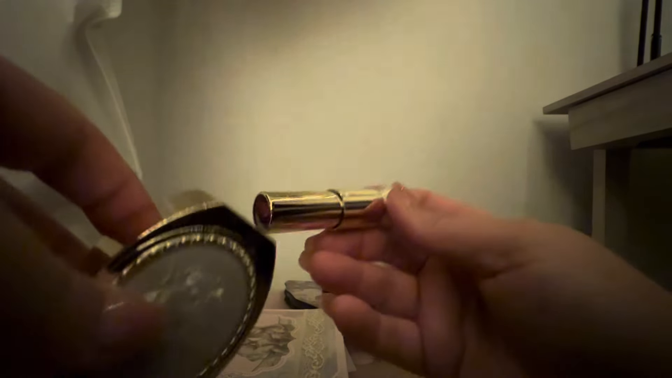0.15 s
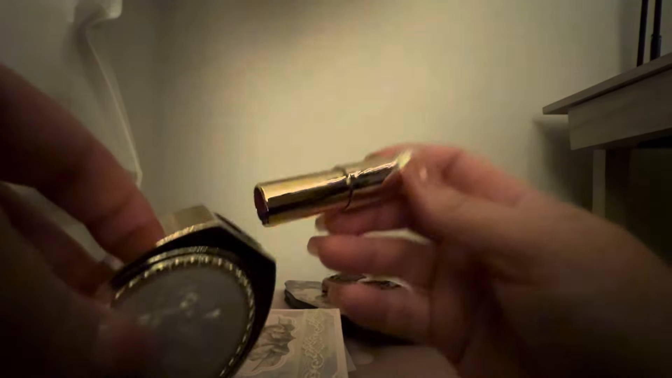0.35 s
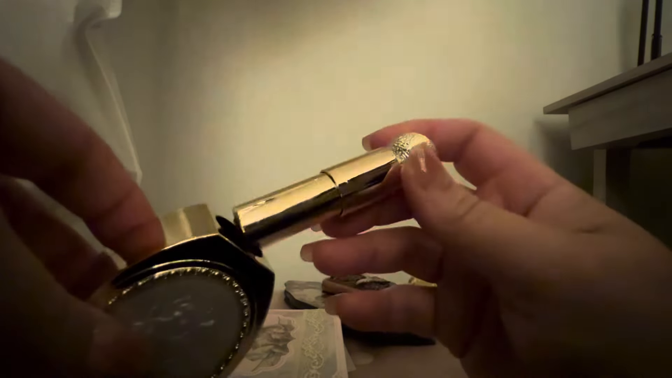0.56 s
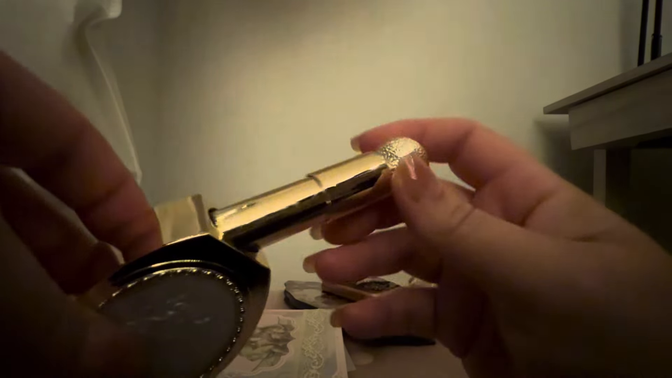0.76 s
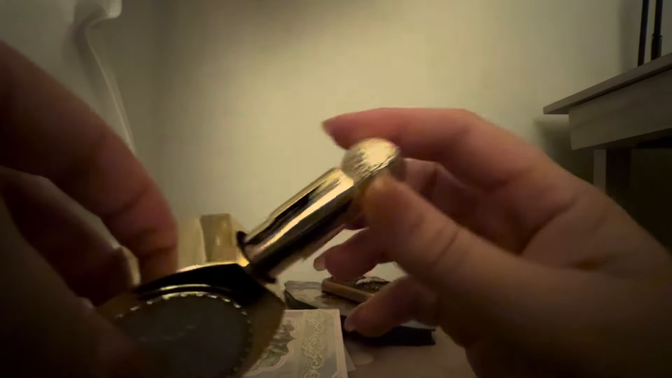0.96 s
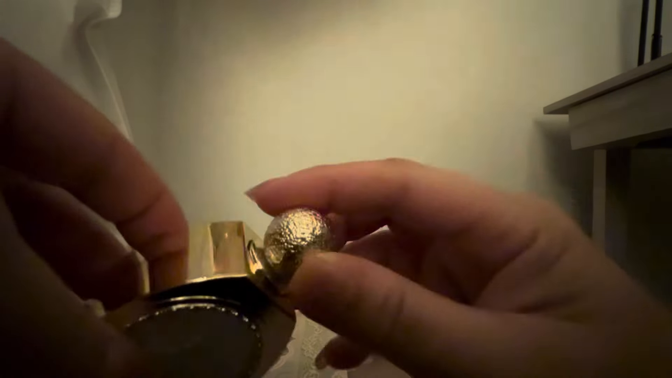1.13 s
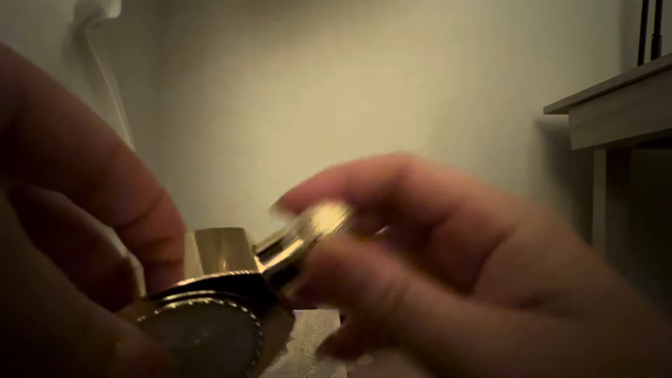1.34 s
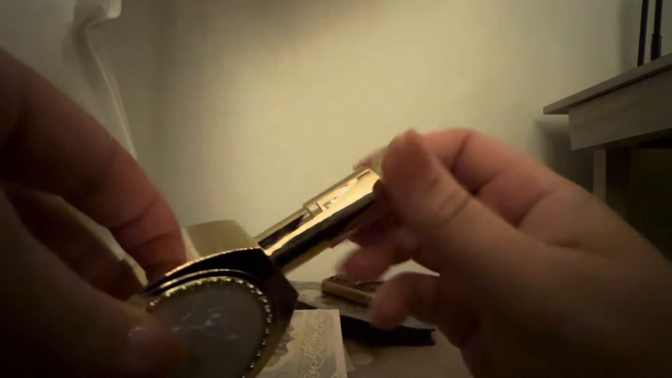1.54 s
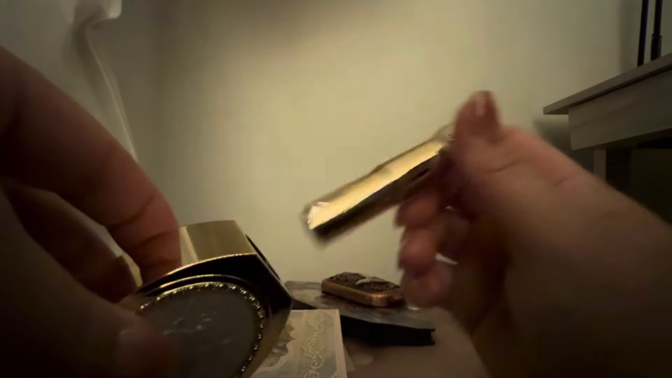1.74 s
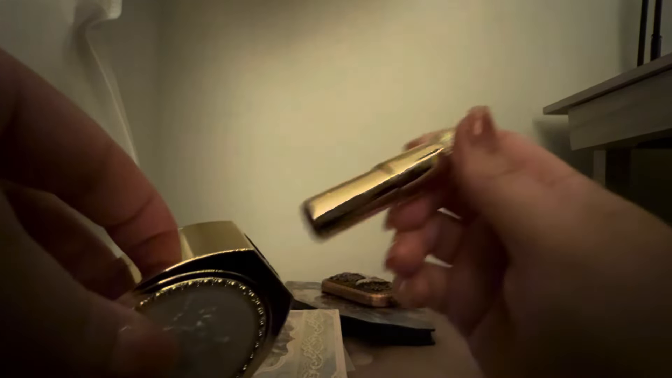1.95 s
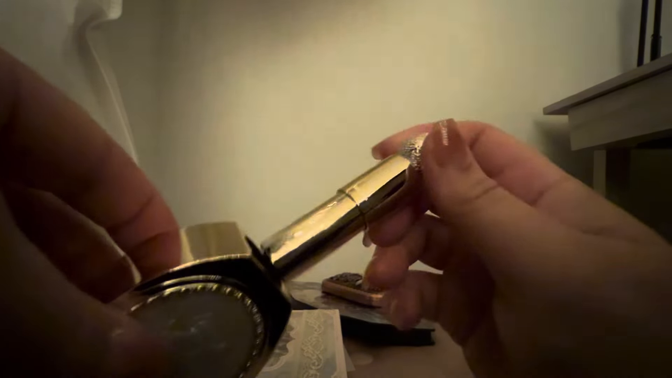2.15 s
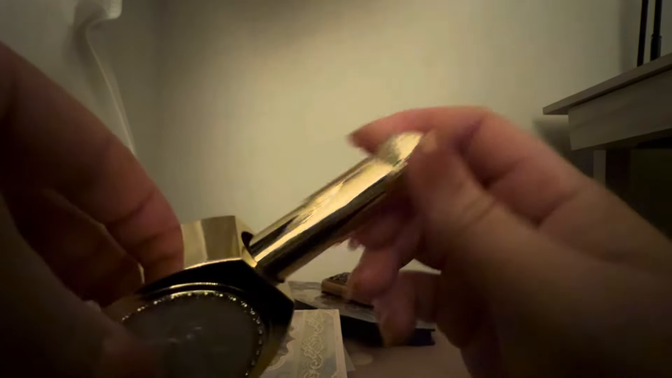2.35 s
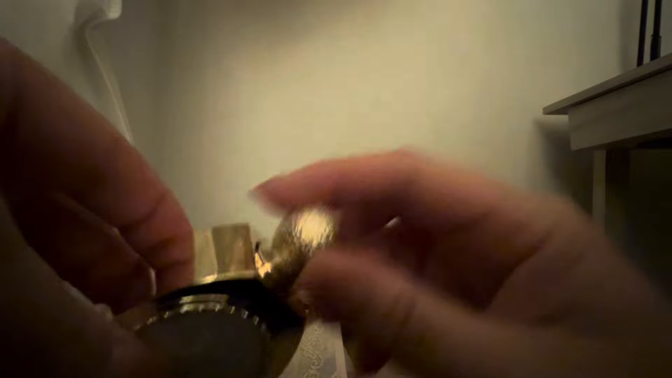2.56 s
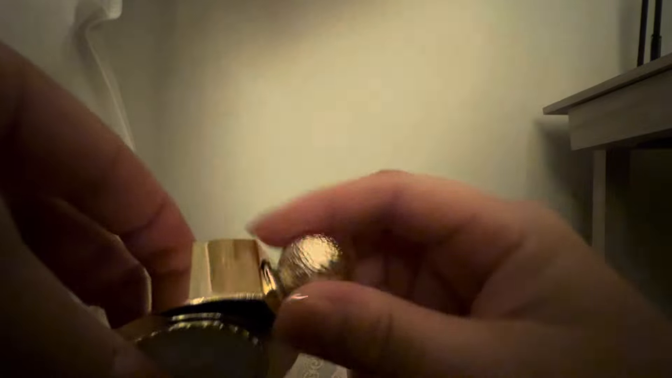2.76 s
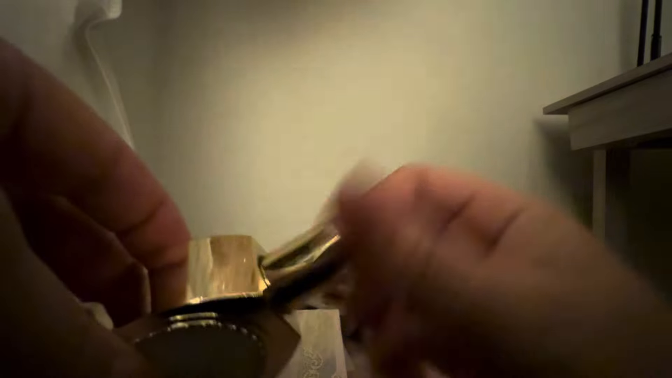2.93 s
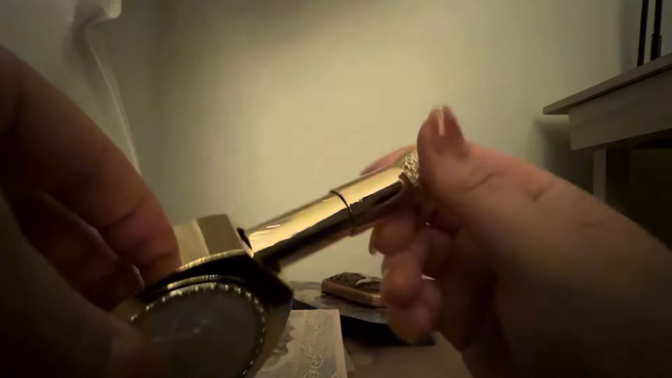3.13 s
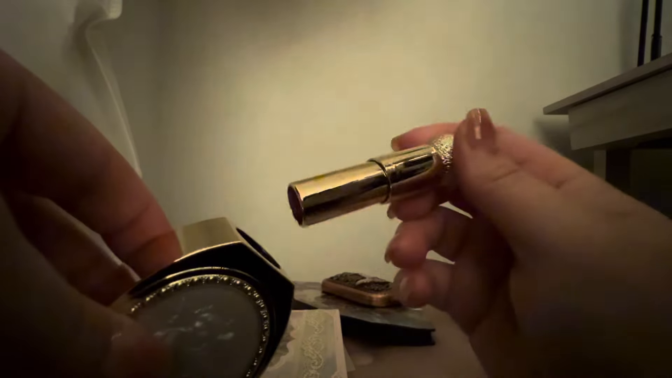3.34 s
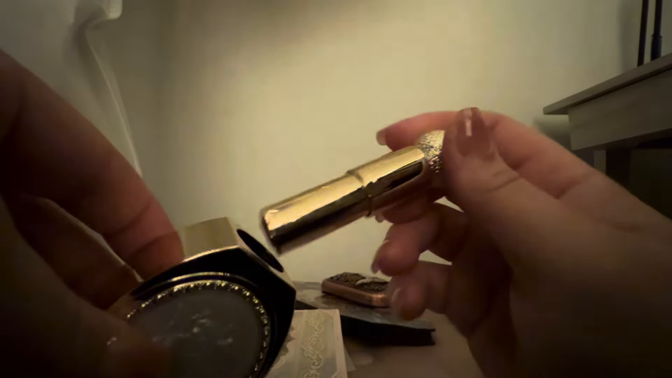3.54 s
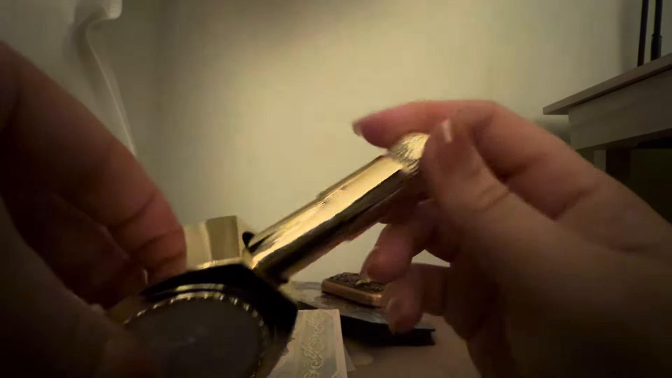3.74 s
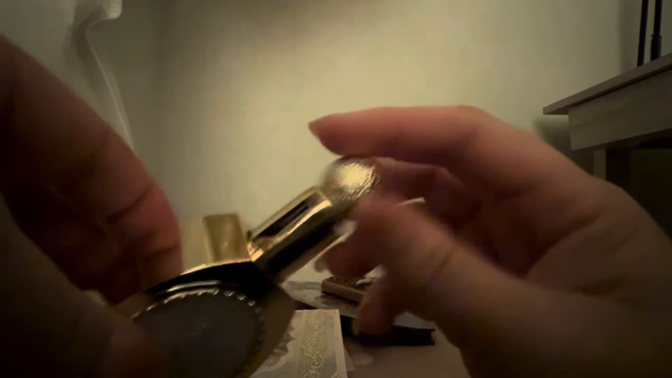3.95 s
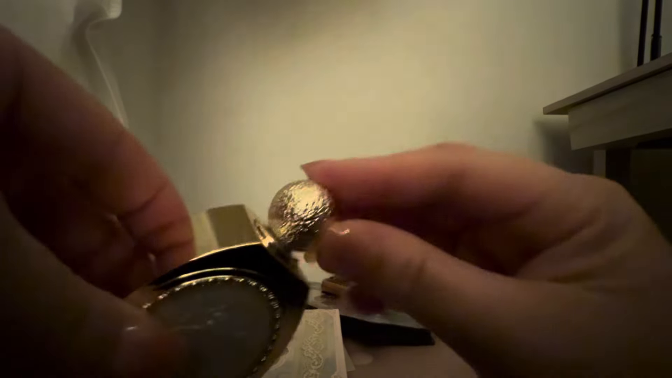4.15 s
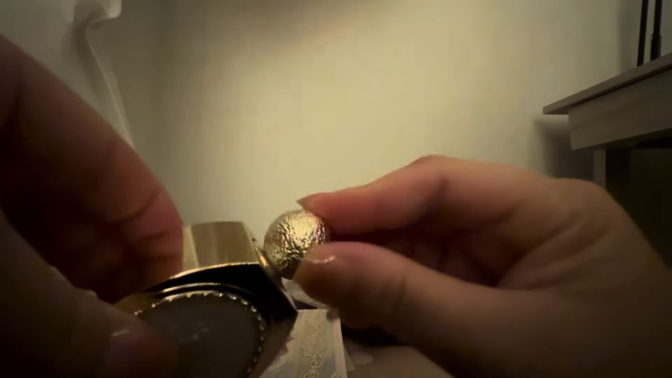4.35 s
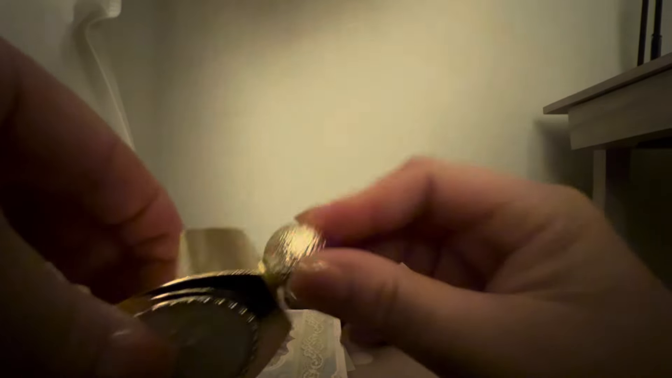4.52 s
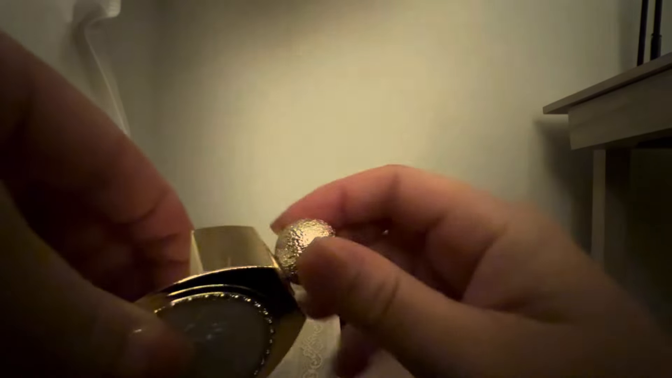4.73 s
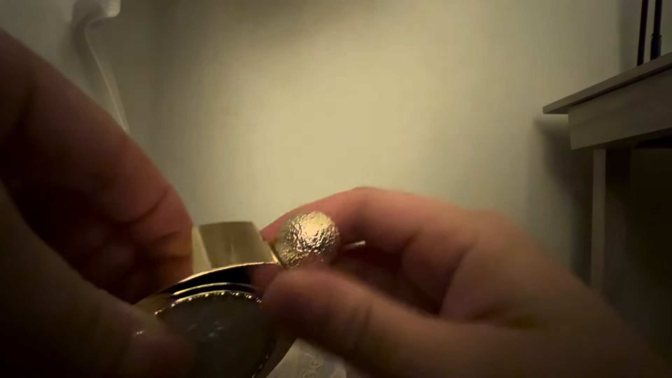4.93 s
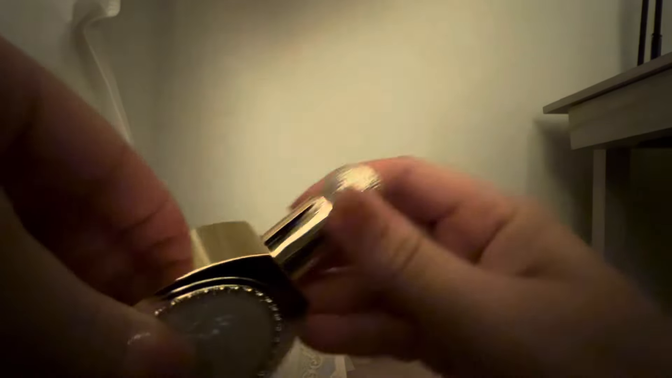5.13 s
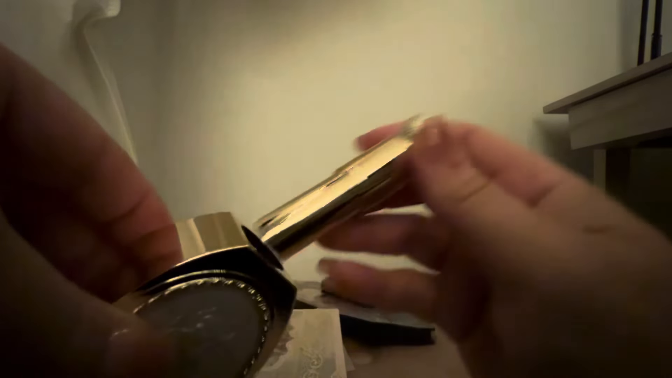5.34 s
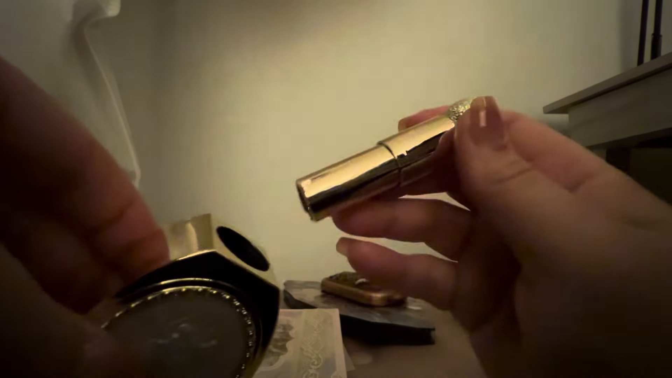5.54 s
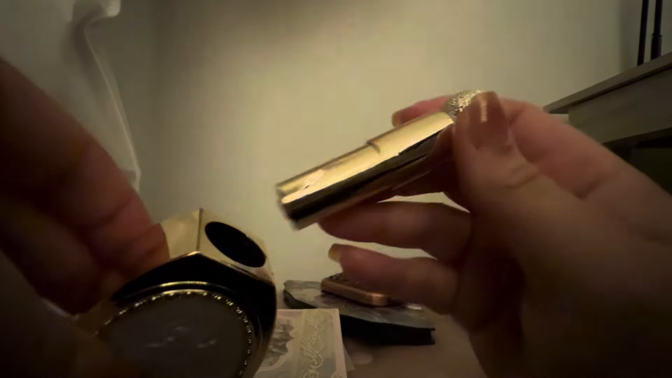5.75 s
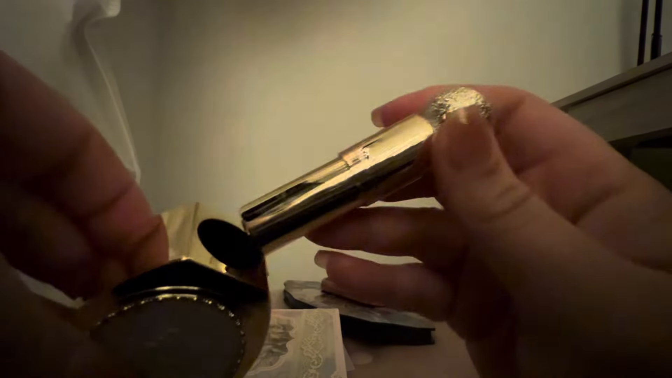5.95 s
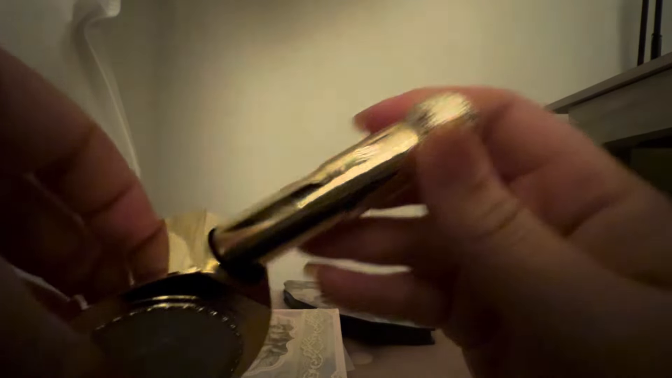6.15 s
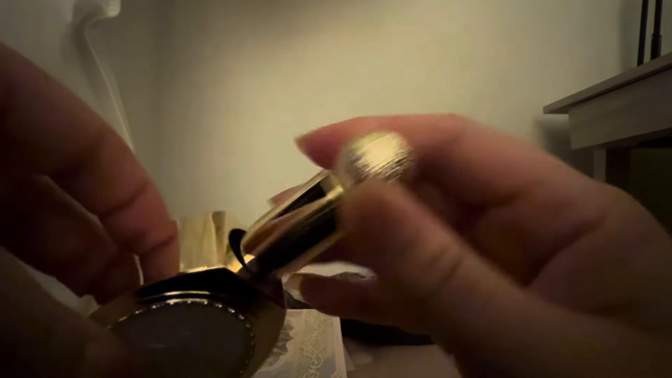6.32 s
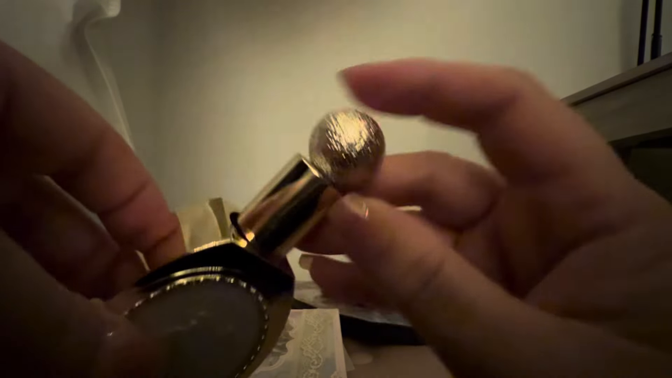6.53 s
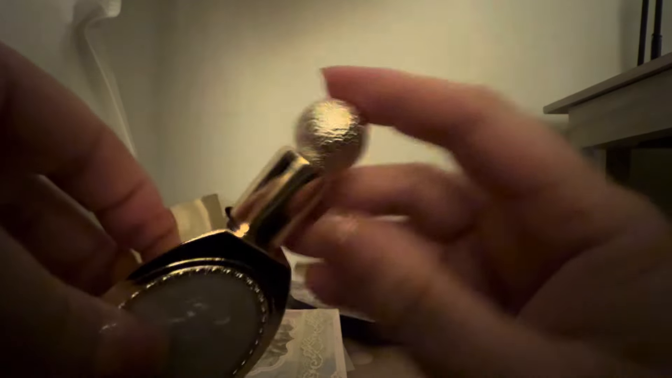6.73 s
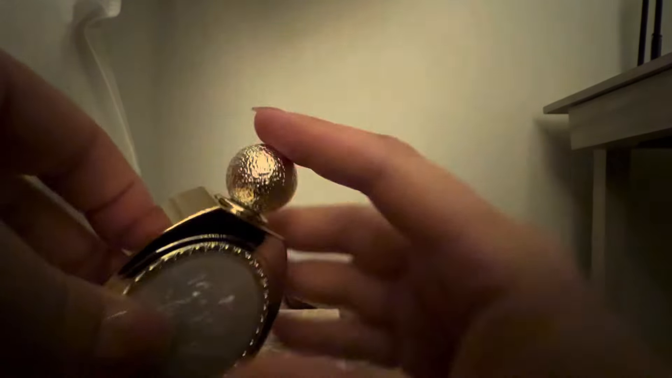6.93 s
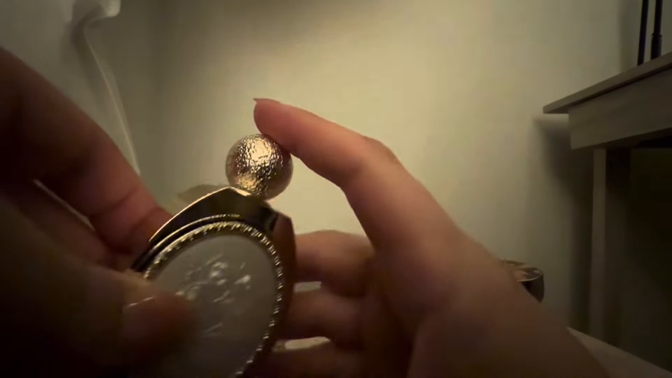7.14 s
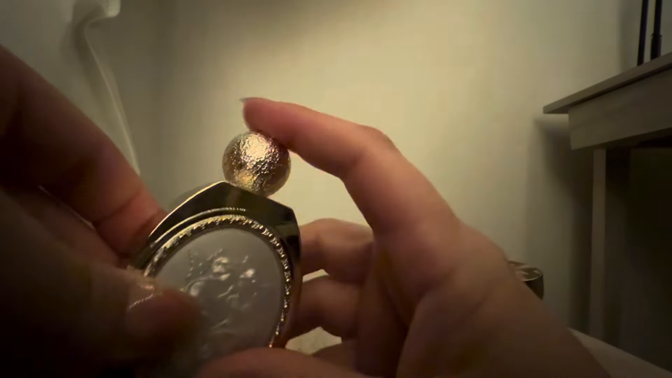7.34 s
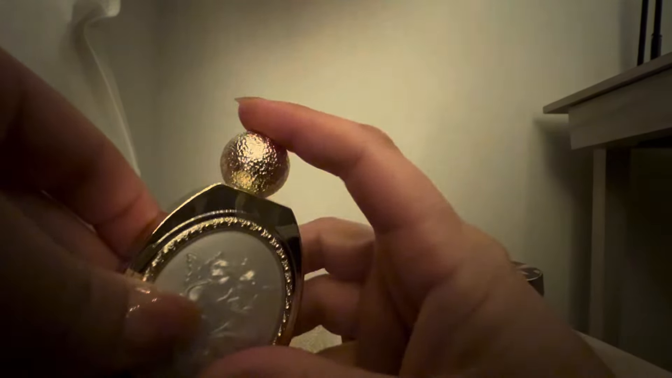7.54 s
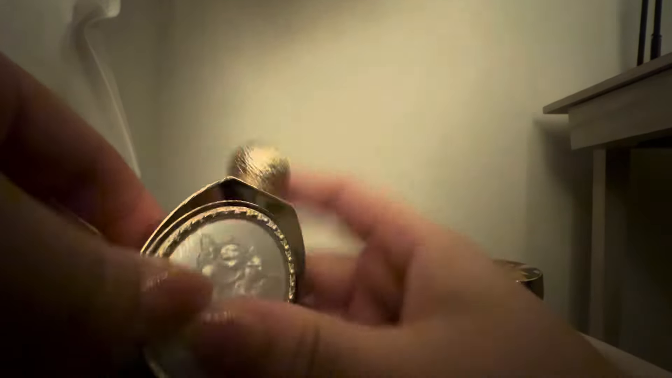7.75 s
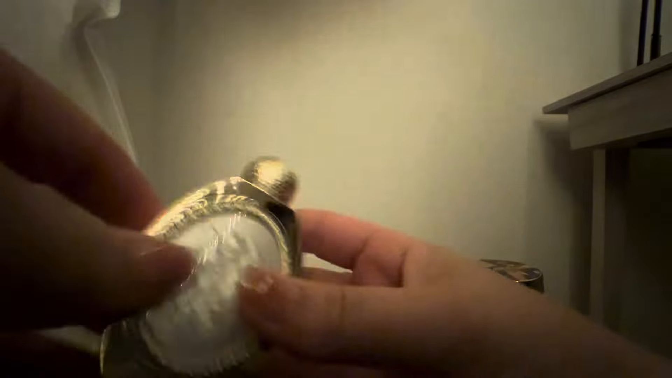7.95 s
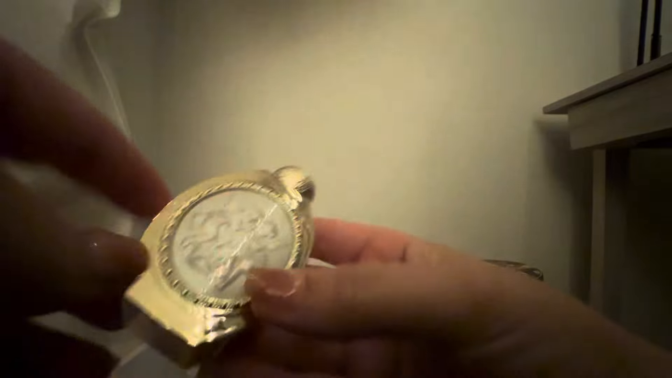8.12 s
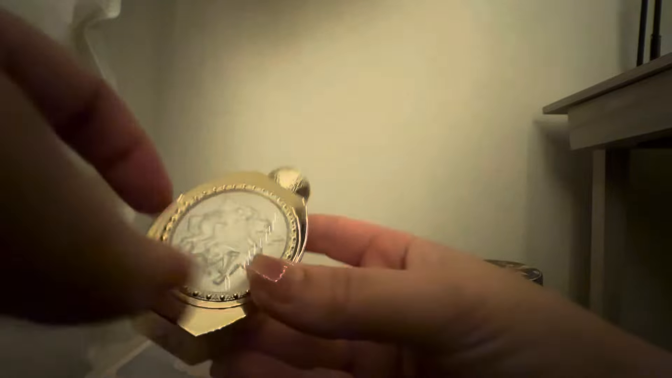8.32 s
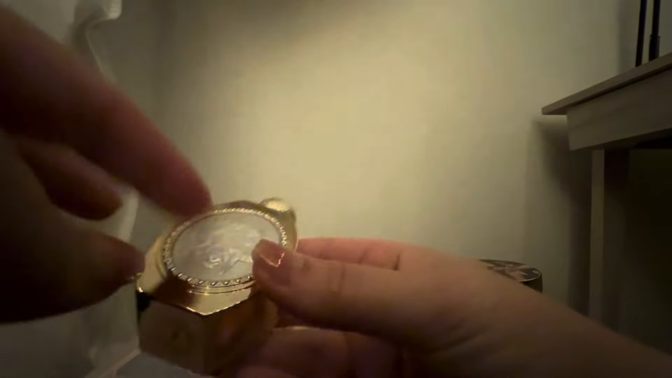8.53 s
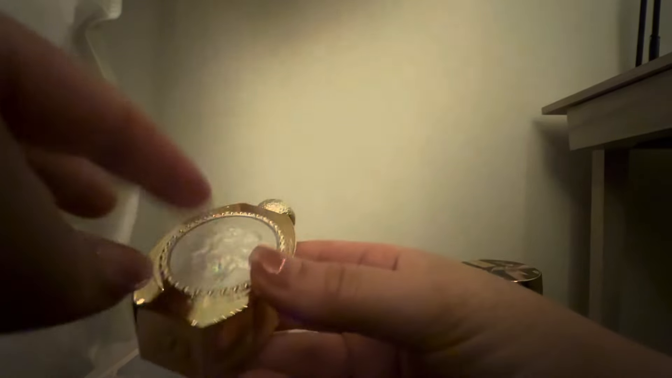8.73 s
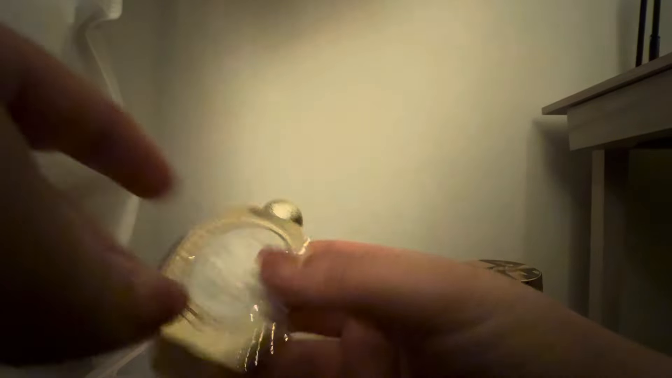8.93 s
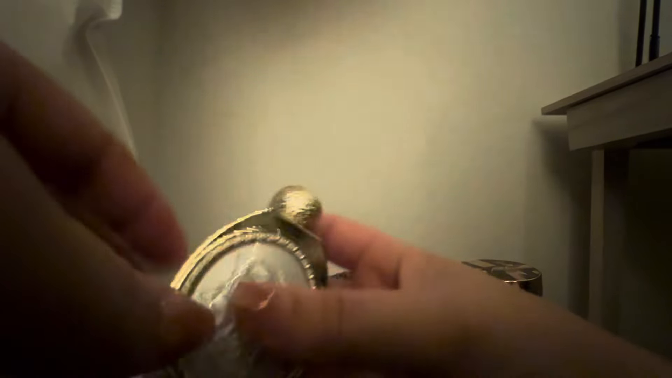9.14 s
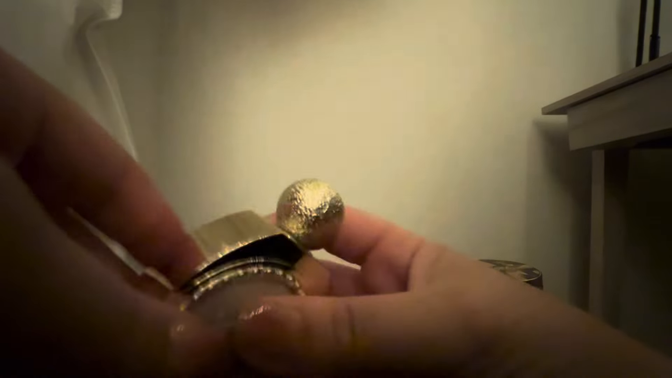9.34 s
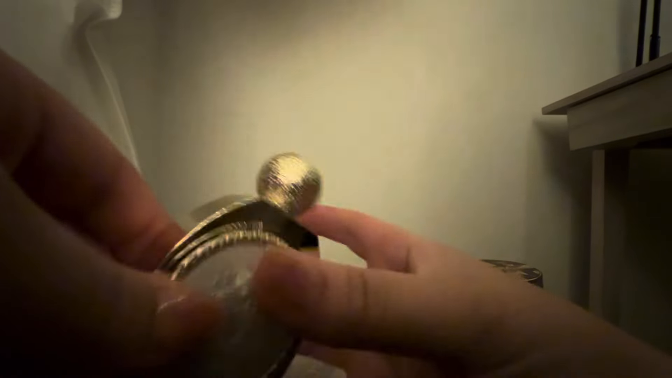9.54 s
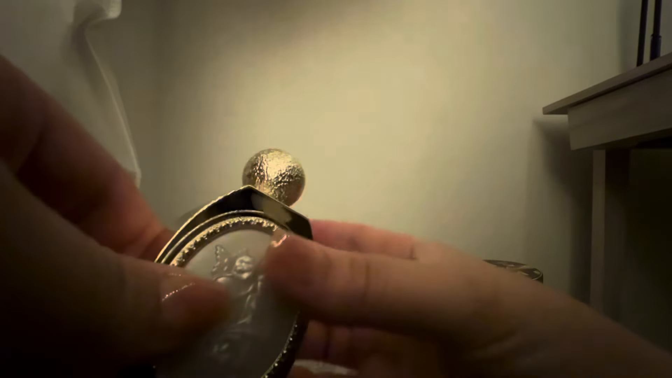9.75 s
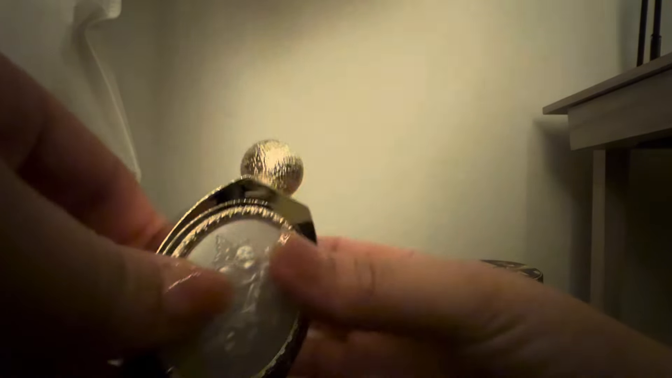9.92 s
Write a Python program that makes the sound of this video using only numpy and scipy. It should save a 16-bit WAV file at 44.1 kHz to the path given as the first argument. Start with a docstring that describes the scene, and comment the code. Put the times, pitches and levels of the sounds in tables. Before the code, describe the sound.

Very close to the microphone in a small quiet room, fingers tick on a metal case while a metal tube is repeatedly pushed into its socket and pulled out with tight clusters of clacks, short scrapes and two small hollow pops. The tube snaps home dryly, then fingernails snap and skid brightly across the rim and lid. Faint low hum and soft hiss continue.

```python
"""Over a low room hum and soft hiss, fingers first tick and rub on a metal powder compact, close by.
A metal lipstick tube knocks and scrapes in the compact's socket; the air column pops as it leaves, twice.
In between and later the tube snaps home; last, nails snap off the rim and skid over the lid.
Contacts are clicks and noise bursts through ringing case modes; rubs and rustle are grainy noise.
A short room and a shaded, lagging right port place it in stereo."""
import sys
import numpy as np
from scipy import signal
from scipy.fft import rfft, irfft, next_fast_len
from scipy.io import wavfile
from scipy.ndimage import uniform_filter1d

SR = 44100
rng = np.random.default_rng(int(sys.argv[2]) if len(sys.argv) > 2 else 0)


def unload_audio(sound):
    """Save the sound as a 16-bit wav file, at the path given as the first command line argument."""
    columns = np.transpose(np.atleast_2d(sound))
    # keep every value between -1 and 1, then stretch to whole-number steps
    steps = np.round(np.clip(columns, -1, 1) * 32767)
    wavfile.write(sys.argv[1], SR, steps.astype(np.int16))


N = 440118
BLOW_S = np.arange(SR // 5) / SR  # time within one blow
GRAZE_SAMPLES, ATTACK_SAMPLES = 88, 353


def undb(db):
    """Decibels to gain."""
    return 10 ** (np.asarray(db) / 20)


def fade(t_s, t60_s):
    """Exponential decay, 60 dB down after t60_s."""
    return np.exp(-np.log(1000) * t_s / t60_s)


def convolve(x, response):
    """Pass x through a response, keeping its length."""
    return signal.fftconvolve(x, response)[:len(x)]


def add(track, start_s, sound):
    """Mix a sound in at start_s."""
    start = max(int(start_s * SR), 0)
    track[start:start + len(sound)] += sound[:N - start]


def over_frequency(table, size):
    """Columns of a (Hz, ..) table, interpolated over log frequency on the bins of a spectrum."""
    hz, *columns = np.transpose(table)
    log_bins = np.log(np.fft.rfftfreq(size, 1 / SR) + 1)
    return [np.interp(log_bins, np.log(hz), column) for column in columns]


def colour(x, points):
    """Minimum-phase filter with the given (Hz, dB) outline, by folding the cepstrum."""
    size = 1024
    cepstrum = irfft(np.log(undb(over_frequency(points, size)[0])))
    cepstrum[1:size // 2] *= 2
    cepstrum[size // 2 + 1:] = 0
    return convolve(x, irfft(np.exp(rfft(cepstrum))))


# FLOOR: spectral density of hum and hiss.
# Each row: frequency in Hz, left in dB per Hz, right in dB per Hz.
FLOOR = [(25, -93, -99), (47.9, -75.5, -80), (65, -71.5, -74.5), (97.7, -76, -85), (141, -94, -99),
         (302, -101, -106), (695, -107, -108), (1160, -109, -118), (1290, -97, -112), (1863, -91, -110),
         (2420, -111, -122), (3930, -118, -127), (7794, -118, -131), (10280, -130, -136),
         (14000, -144, -144)]


def background(shared_below_hz=150):
    """Steady shaped noise: a low wavering hum largely common to both sides, under a soft band of hiss."""
    left_db, right_db = over_frequency(FLOOR, N)
    left, own = rfft(rng.standard_normal((2, N))) * np.sqrt(SR / 2)
    likeness = .96 / (1 + (np.fft.rfftfreq(N, 1 / SR) / shared_below_hz) ** 4)
    right = likeness * left + np.sqrt(1 - likeness ** 2) * own
    return irfft(np.array([left * undb(left_db), right * undb(right_db)]), N)


def room(x, near_db=-12, near_t60_s=0.18, far_db=-23, far_t60_s=0.26, gap_s=0.0019, table_s=.013, table_db=-20):
    """Close surfaces answer at once, the walls ring on briefly; the top treble is soaked up."""
    t_s = np.arange(SR // 2) / SR
    response = np.zeros(len(t_s))
    for db, t60_s in (near_db, near_t60_s), (far_db, far_t60_s):
        tail = rng.standard_normal(len(t_s)) * fade(t_s, t60_s) * np.minimum(t_s / gap_s, 1) ** 2
        response += undb(db) * tail / np.linalg.norm(tail)
    response[int(table_s * SR)] += undb(table_db)
    absorption = [(120, -0.5), (600, -2.0), (1500, -3.5), (3000, -5.0), (6000, -1.5), (9000, 1.5), (13000, -17.5)]
    return colour(convolve(x, response), absorption)


# PORT: right port against the left.
# Each row: frequency in Hz, level in dB, phase lag in rad, scattered share 0-1.
PORT = [(70, -9.5, 1.6, 0.5), (182.2, -10.5, 0.28, 0.2), (526, -6.5, 2.9, 0.5), (1050, -3.5, 4.57, 0.3),
        (2490, -8, 5.06, 0.7), (5270, -17.5, 5.8, 0.98), (9800, -6.5, 3.3, 0.97), (10120, -2, 3.3, 0.1),
        (12270, 2, 6.5, 0), (15400, -5.5, 18, 0.94)]


def ports(x, scatter_t60_s=0.049, count=9):
    """Left is direct; right is shaded, lags, and gets sound scattered by the hands, differently in each pose."""
    size = next_fast_len(N + SR)
    db, lag_rad, share = over_frequency(PORT, size)
    share = np.clip(share, 0, 1)
    pose = np.linspace(0, count - 1, N)
    scattered = np.zeros(N)
    scatters = rng.standard_normal((count, len(BLOW_S))) * fade(BLOW_S, scatter_t60_s)
    for k, scatter in enumerate(scatters):
        span = np.flatnonzero(abs(pose - k) < 1)
        posed = x[span] * np.cos(np.pi / 2 * (pose[span] - k))  # crossfade between poses
        add(scattered, span[0] / SR, signal.fftconvolve(posed, scatter / np.linalg.norm(scatter)))
    direct = np.sqrt(1 - share) * np.exp(-1j * lag_rad) * rfft(x, size)
    right = direct + np.sqrt(share) * rfft(scattered, size)
    return np.array([x, irfft(right * undb(db), size)[:N]])


def body(modes, ring_db, spot_db=3, detune=.012):
    """A click and its ringing; the spot that is struck and the grip reweight and detune the modes."""
    hz, db, t60_s = np.transpose(modes)[:, :, None]
    spot, grip = rng.standard_normal((2, len(modes), 1))
    size = undb(db + ring_db + spot_db * spot) * 2 * np.log(1000) / (t60_s * SR)
    ringing = np.cos(2 * np.pi * hz * (1 + detune * grip) * BLOW_S)
    response = np.sum(size * fade(BLOW_S, t60_s) * ringing, axis=0)
    response[0] += 1
    return response


# EDGES_HZ: edges in Hz of the thump, hollow, shell, metal and glint ranges.
EDGES_HZ = [90, 350, 1050, 3200, 9500, 16500]
RANGES = [signal.butter(3, edges, "band", fs=SR, output="sos") for edges in zip(EDGES_HZ, EDGES_HZ[1:])]


def voice(sound, levels_db, size):
    """Filter a contact towards the given RMS per range over its first samples; short lists name upper ranges."""
    count = len(levels_db)
    gains_db = [db - 20 * np.log10(np.std(signal.sosfilt(sos, sound[:size])))
                for db, sos in zip(levels_db, RANGES[-count:])]
    edges = EDGES_HZ[-count - 1:]
    inset = 2 ** (1 / 3)
    outline = [(hz, db) for lo, hi, db in zip(edges, edges[1:], gains_db) for hz in (lo * inset, hi / inset)]
    return colour(sound, outline)


def strike(modes, outline, levels_db, ring_db, graze_db, chatter_db, chatter_t60_s, rattle_db, rattle_t60_s):
    """Surfaces graze, meet sharply, chatter briefly and rattle on; all of it drives the modes."""
    graze, chatter, rattle = rng.standard_normal((3, len(BLOW_S)))
    push = undb(chatter_db) * chatter * fade(BLOW_S, chatter_t60_s)
    push += undb(rattle_db) * rattle * fade(BLOW_S, rattle_t60_s)
    push[0] += 1
    rise = np.linspace(0, 1, GRAZE_SAMPLES) ** 2
    push = np.concatenate([undb(graze_db) * graze[:GRAZE_SAMPLES] * rise, push])
    rung = convolve(push, body(modes, ring_db))
    return voice(colour(rung, outline), levels_db, GRAZE_SAMPLES + ATTACK_SAMPLES)


def touch(db, hardness_db):
    """Hollow, shell and metal levels of a light contact: a hard one loses its bass, a soft one its treble."""
    return db - max(hardness_db, 0), db - abs(hardness_db) / 2, db + min(hardness_db, 0)


def rustle(rustle_db=-79, stir_db=2, stir_hz=5, grain_db=4.0, busy_db=4.5, busy_s=0.25):
    """The hands never hold quite still: grainy skin noise wavers, louder where knocks and ticks crowd."""
    marks_s = np.arange(0, N / SR + 1, 1 / stir_hz)
    grains = rng.standard_normal(N) * undb(grain_db * np.minimum(rng.exponential(size=N), 6))
    skin = colour(grains, [(100, 6.5), (260, 4), (600, -9.5), (1500, -18), (5500, -13.5), (8500, -11), (13000, -38)])
    stir = np.interp(np.arange(N) / SR, marks_s, rng.standard_normal(len(marks_s)))
    contacts = np.zeros(N)
    contacts[[int(s * SR) for s, *_ in KNOCKS + TICKS]] = 1
    size = int(busy_s * SR)
    density = uniform_filter1d(uniform_filter1d(contacts, size), size)
    busy = np.clip(density * size, 0, 2)
    return skin / np.std(skin) * undb(rustle_db + stir_db * stir + busy_db * busy)


# CASE: modes of the hand-held case.
# Each row: nominal frequency in Hz, relative level in dB, nominal t60 in seconds.
CASE = [(410, -10.5, 0.0046), (713.5, 5, 0.034), (863, 2, 0.025), (1353, 6, 0.03), (1720, -3, 0.012),
        (2200, 2, 0.07), (3120, -3, 0.013), (4183, 6, 0.055), (5545, 11.5, 0.02), (6060, 5.5, 0.025),
        (6460, 12.5, 0.028), (7000, 7, 0.035), (8870, 12, 0.023), (11660, 7.5, 0.01)]
# SLIDING: colour of sliding. Each row: frequency in Hz, level in dB.
SLIDING = [(100, -2), (280, 9), (900, 0), (2000, 0), (3200, -0.5), (4500, 1), (5900, 5), (8000, -5.5),
           (10000, -14), (12500, -15), (16000, -12.5)]
# RUBS: skin and tube sliding over the case.
# Each row: start, firmest and end in seconds, level before range offsets and pressure in dB, hardness in dB.
# Firmest past the end: the stroke stops while rising; before the start: it only falls.
RUBS = [(0, -0.3, .2, -71, 1), (.7, 1.2, .92, -64.5, -6), (1.3, 1.6, 1.48, -63.5, 0),
        (2.225, 2, 2.43, -65, 0.5), (2.47, 3, 2.62, -54.5, -5.5), (2.669, 2.92, 2.98, -70, -4.5),
        (3.956, 4.5, 4.01, -48.5, -3), (4.546, 3.5, 4.9, -68, 5), (5.045, 4.5, 5.18, -52.5, -3.5),
        (5.214, 6, 5.34, -63, 13), (6.101, 6, 6.3, -65.5, -7), (7.038, 6.5, 7.31, -62.5, -6),
        (7.658, 8, 7.722, -48, 14), (7.775, 8, 7.85, -54, 15), (7.85, 7.89, 7.95, -55.5, 5),
        (7.88, 8, 8.015, -51.5, 14), (8.638, 8.5, 8.675, -49, 24), (8.8, 9.5, 8.875, -51.5, 21),
        (8.896, 9, 9.02, -59, 23), (9.09, 9.5, 9.24, -64, 16.5), (9.271, 9.5, 9.36, -53.5, 11),
        (9.366, 9.5, 9.45, -65.5, 17)]


def rubs(grain_db=4.0, slip_db=3.0, slip_hz=160, swell=0.76, hollow_db=-1, shell_db=-6, metal_db=2,
         glint_db=-5, bite=0.36, firm_db=-55, skid_db=-24, skid_hardness_db=34, skid_glint_db=-16,
         skid_peak_s=0.02, skid_s=0.064):
    """Dense tiny catches of uneven size excite the case under changing pressure.
    Firmer strokes glint more; after each nail snap the nail skids on over the lid, hard but smooth."""
    out = np.zeros(N)
    catches = rng.standard_normal(N) * undb(grain_db * np.minimum(rng.exponential(size=N), 5))
    slips = uniform_filter1d(rng.standard_normal(N), int(SR / slip_hz)) * np.sqrt(SR / slip_hz)
    friction = colour(catches * undb(slip_db * slips), SLIDING)
    strokes = [(*times, db, hardness_db, glint_db + bite * (db - firm_db)) for *times, db, hardness_db in RUBS]
    skids = [(s, s + skid_peak_s, s + skid_s, db + skid_db, skid_hardness_db, skid_glint_db)
             for s, _, db, _ in NAILS]
    for start_s, firmest_s, end_s, db, hardness_db, edge_db in strokes + skids:
        span = np.arange(int(start_s * SR), int(end_s * SR))
        hollow, shell, metal = touch(db, hardness_db)
        levels_db = hollow + hollow_db, shell + shell_db, metal + metal_db, metal + edge_db
        stroke = voice(convolve(friction[span], body(CASE, ring_db=-7.5)), levels_db, len(span))
        pressure = np.interp(span / SR, [start_s, firmest_s, end_s], [0, 2, 0])
        add(out, start_s, stroke * pressure ** swell)
    return out


# TOUCH: colour of a light touch. Each row: frequency in Hz, level in dB.
TOUCH = [(120, -22.5), (300, -3.5), (700, -5.5), (1200, -1.5), (2500, 2), (5000, -1), (8500, -8),
         (11500, -22.5), (16000, -27)]
# TICKS: light touches, from a soft fingertip (hardness below 0) to bare metal (above 0).
# Each row: time in seconds, level before range offsets and trim in dB, hardness in dB.
TICKS = [(.0933, -48, 1), (0.2392, -51.5, -12.5), (0.2824, -60.5, 29), (0.418, -67, -2), (0.535, -56, -17),
         (0.5962, -48, 11.5), (0.6448, -55, 0), (0.6896, -50.5, 11), (.7325, -55, -9.5),
         (0.7589, -49, 13.5), (0.79, -54, -3.5), (.823, -60, 13), (.881, -58.5, 6.5), (0.9595, -56, 9.5),
         (1.214, -61.5, 9.5), (1.271, -63, -8.5), (1.351, -59, -13), (1.376, -53.5, -22), (1.713, -56, 0),
         (1.98, -59.5, 3.5), (2.2256, -54.5, 7), (2.292, -52.5, 10.5), (2.3362, -52.5, 8),
         (2.549, -46, -7.5), (2.699, -55.5, 1.5), (2.7834, -55.5, -14), (3.4178, -53.5, -11),
         (3.642, -60, 5), (3.6854, -47.5, 11), (3.756, -49, 10.5), (4.157, -55.5, 0), (4.251, -51.5, -16.5),
         (4.3372, -50, 2.5), (4.3616, -49, 0.5), (4.406, -47, -12.5), (4.5918, -53, 2), (4.654, -46, 2),
         (4.753, -48.5, 8), (4.7798, -52, 0), (4.815, -44.5, -10.5), (5.0013, -55.5, 2.5),
         (5.065, -51.5, 1), (5.128, -47, -4), (5.2682, -46.5, 19.5), (5.363, -61.5, 6.5),
         (5.483, -51.5, -12.5), (5.677, -51.5, 2), (5.785, -56, -13), (6.1992, -50, 3.5), (6.221, -52, 10),
         (6.2694, -52, 4.5), (6.3055, -50, 6), (6.645, -59.5, -13.5), (6.8693, -53, -12),
         (7.0812, -48.5, -13.5), (7.286, -50.5, -11), (7.429, -56.5, -5.5), (7.5049, -51, -12.5),
         (7.725, -54.5, 2.5), (7.7761, -54.5, 3), (7.8307, -45, -15.5), (7.9573, -51.5, 9),
         (7.969, -44.5, 3.5), (8.0384, -48.5, -13.5), (8.045, -56, 49), (8.0798, -57.5, 38),
         (8.2187, -52, 0.5), (8.516, -61, 4), (9.1842, -55.5, -14), (9.587, -60, -1.5), (9.813, -61, 0.5)]


def ticks(shell_db=-2, glint_db=-21, sparkle=.5, stray_db=-63, stray_spread_db=8, stray_hardness_db=12,
          stray_s=0.18, count=10, trim_db=3.0):
    """Light touches, damped by the fingers; fainter stray ones follow as the grip settles."""
    out = np.zeros(N)
    strays = []
    for which, late, faint, hard in rng.random((count, 4)):
        s = TICKS[int(which * len(TICKS))][0] + stray_s * late
        strays.append((s, stray_db - stray_spread_db * faint, stray_hardness_db * (2 * hard - 1)))
    for s, db, hardness_db in list(TICKS) + strays:
        hollow, shell, metal = touch(db, hardness_db)
        levels_db = hollow, shell + shell_db, metal, metal + glint_db + sparkle * hardness_db
        tick = strike(CASE, TOUCH, levels_db, ring_db=-9.0, graze_db=-12.0, chatter_db=-4,
                      chatter_t60_s=0.017, rattle_db=-17.5, rattle_t60_s=0.088)
        add(out, min(s, N / SR) - GRAZE_SAMPLES / SR, tick)
    return out * undb(trim_db)


# NAIL: colour of a nail snap. Each row: multiple of its pitch, level in dB.
NAIL = [(.03, -12.5), (0.149, -36), (.37, -17.5), (0.562, -7), (0.772, -0.5), (1, 3), (1.2, -4),
        (1.598, -17), (2.5, -26.5)]
# NAILS: a nail slips off the rim of the compact.
# Each row: time in seconds, pitch in Hz, metal level before trim in dB, glint over metal in dB.
NAILS = [(8.3183, 6550, -35.5, -20), (8.5657, 5620, -31, -13.5), (8.603, 5440, -42.5, -17),
         (8.774, 5070, -29.5, -16), (8.8907, 6900, -44.5, 2), (9.0397, 7440, -25.5, -1)]


def nails(shell_db=-13, held=.35, trim_db=2.5):
    """Hard, bright snaps on the rim; the holding hand shortens and broadens the modes, and the lid jingles on."""
    out = np.zeros(N)
    modes = [(hz, db, t60_s * held) for hz, db, t60_s in CASE]
    for s, pitch_hz, db, edge_db in NAILS:
        outline = [(multiple * pitch_hz, outline_db) for multiple, outline_db in NAIL]
        levels_db = db + shell_db, db, db + edge_db
        snap = strike(modes, outline, levels_db, ring_db=-0.5, graze_db=-8, chatter_db=-4,
                      chatter_t60_s=0.006, rattle_db=-31.5, rattle_t60_s=0.15)
        add(out, s - GRAZE_SAMPLES / SR, snap)
    return out * undb(trim_db)


# CONTACT: colour of a knock or pop. Each row: frequency in Hz, level in dB.
CONTACT = [(100, 5.5), (300, 4), (700, 3), (1400, -1.5), (2400, -10), (3300, -1), (4400, 6.5), (6500, 1.5),
           (8000, -1), (10000, -13), (12000, -10), (16000, -17.5)]
# SOCKET: air column of the open socket.
# Each row: nominal frequency in Hz, relative level in dB, t60 in seconds.
SOCKET = [(1301, 34, 0.049)]
# POPS: the tube clears the socket. Each row: time in seconds, shell level before trim in dB.
POPS = [(2.0959, -36), (5.9056, -41)]


def pops(hollow_db=-2, metal_db=-12, glint_db=-16, trim_db=0.65):
    """The opened socket sounds its air column along with the metal."""
    out = np.zeros(N)
    for s, db in POPS:
        levels_db = db + hollow_db, db, db + metal_db, db + glint_db
        pop = strike(CASE + SOCKET, CONTACT, levels_db, ring_db=-11.5, graze_db=-36, chatter_db=-17.0,
                     chatter_t60_s=0.0089, rattle_db=-23.5, rattle_t60_s=0.023)
        add(out, s - GRAZE_SAMPLES / SR, pop)
    return out * undb(trim_db)


# CATCH: colour of the catch snapping home. Each row: multiple of its pitch, level in dB.
CATCH = [(.08, -7.5), (.3, -6.5), (.6, 2), (1, 5.5), (1.5, -5), (2.2, -4.5), (3.2, -10), (5, -11.5),
         (7, -22.5), (12, -21.5)]
# SNAPS: the tube is pressed home.
# Each row: time in seconds, catch pitch in Hz, shell level before trim in dB,
# then hollow (weight), metal (treble) and glint (edge) over shell in dB.
SNAPS = [(4.314, 2630, -28, -9.5, -2, -20.5), (6.7844, 1340, -26, -22, -8, -7.5),
         (7.3602, 1163, -22, -10.5, -10, -18.5)]


def snaps(thump_db=-7, gripped_db=-18, trim_db=0.5):
    """The catch takes the tube with one short, dry click; the firm grip lets the case ring only faintly."""
    out = np.zeros(N)
    for s, pitch_hz, db, weight_db, treble_db, edge_db in SNAPS:
        outline = [(multiple * pitch_hz, outline_db) for multiple, outline_db in CATCH]
        levels_db = db + np.array([weight_db + thump_db, weight_db, 0, treble_db, edge_db])
        snap = strike(CASE, outline, levels_db, gripped_db, graze_db=-13.0, chatter_db=-14.5,
                      chatter_t60_s=0.011, rattle_db=-39.5, rattle_t60_s=0.09)
        add(out, s - GRAZE_SAMPLES / SR, snap)
    return out * undb(trim_db)


# KNOCKS: tube against socket; a square hit has weight (bass), a hit on the rim has edge (glint).
# Each row: time in seconds, metal level before trim in dB, hollow (weight) over metal in dB,
# glint (edge) over metal in dB, nominal tube ring in Hz, set by its depth and the grip.
KNOCKS = [(0.9898, -36.5, -4, -5, 5390), (1.002, -42.5, -2, -9, 5780), (1.021, -29, 5, 6.5, 8300),
          (1.036, -38, -8, -16.5, 6350), (1.04, -39.5, -5, 1, 5420), (1.086, -24.5, -7, -13.5, 5400),
          (1.089, -25, -11, -23.5, 5430), (1.4107, -39, -2.5, -11, 5310), (1.432, -42, -7, -2, 4040),
          (1.4437, -41.5, -5.5, -4, 4590), (2.2522, -37.5, -18.5, -6, 5490),
          (2.4106, -35.5, -10, -13, 4660), (2.4194, -40.5, -15, -19, 4520), (2.428, -27, -5.5, -9, 5410),
          (2.4534, -22.5, -4.5, -9, 6300), (2.4577, -35.5, 10.5, -7, 6200), (2.9427, -42.5, -5, -10, 6500),
          (2.9626, -32.5, -5, -4, 5100), (3.8915, -41.5, -4.5, -8.5, 4670), (3.913, -32.5, -3, -4, 5300),
          (3.9396, -29.5, 8.5, 8, 4900), (3.9727, -38, -1, -5, 5770), (4.005, -35.5, -9.5, -30, 5390),
          (4.0258, -25.5, -10, -13.5, 6230), (4.032, -30, -4, -21, 5110), (5.0753, -39.5, 2.5, -2, 6440),
          (5.098, -45.5, 3, -2.5, 6300), (5.2354, -42, -7, -9, 5330), (5.2543, -40, -2, -7, 4710),
          (6.2947, -37, -4, -15, 6180), (6.319, -35.5, 4.5, -13.5, 3940), (6.3656, -25.5, -7, -11, 6840),
          (6.372, -37, 6, -6, 6440), (6.7404, -45.5, 2.5, -13.5, 7010), (6.752, -43, 5, -6, 5400),
          (6.759, -35.5, -7.5, -19, 5180), (6.786, -29.5, 1.5, -8, 4850), (6.795, -40.5, 3, -3, 6600)]


def knocks(ring_db=-6.5, tube_db=17, tube_t60_s=.01, freedom=0.17, thump_db=-7, shell_db=-2, flex=0.18,
           firm_db=-26, trim_db=-1.0):
    """The tube hits rim, wall and bottom; firm knocks flex the shell and sound the tube, weightless ones ring freely."""
    out = np.zeros(N)
    for s, db, weight_db, edge_db, ring_hz in KNOCKS:
        firmness_db = db - firm_db
        levels_db = db + np.array([weight_db + thump_db, weight_db, shell_db + flex * firmness_db, 0, edge_db])
        tube = (ring_hz, tube_db + firmness_db / 2, tube_t60_s)
        knock = strike(CASE + [tube], CONTACT, levels_db, ring_db - freedom * weight_db, graze_db=-12.5,
                       chatter_db=-7.5, chatter_t60_s=0.011, rattle_db=-26.5, rattle_t60_s=0.074)
        add(out, s - GRAZE_SAMPLES / SR, knock)
    return out * undb(trim_db)


def scene():
    """All handling sounds, their room and the background."""
    handling = knocks() + snaps() + ticks() + nails() + pops() + rubs() + rustle()
    # things this small radiate no deep bass
    handling = signal.sosfilt(signal.butter(2, 85, "high", fs=SR, output="sos"), handling)
    return ports(handling + room(handling)) + background()


def record(dry, top_hz=16300):
    """The recorder cuts the top: a steep elliptic low-pass."""
    return signal.sosfilt(signal.ellip(8, .2, 70, top_hz, fs=SR, output="sos"), dry)


dry = scene()
out = record(dry)
unload_audio(out)
```